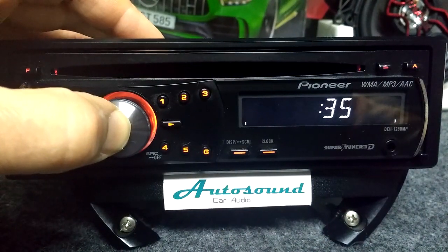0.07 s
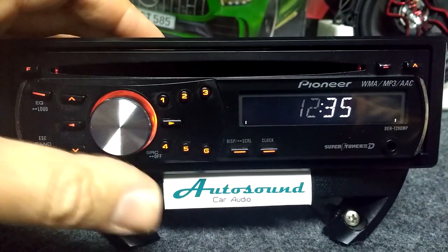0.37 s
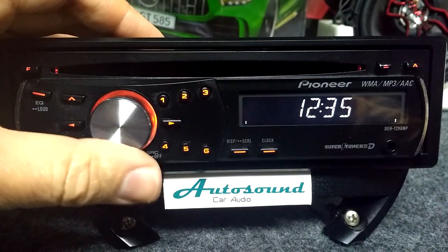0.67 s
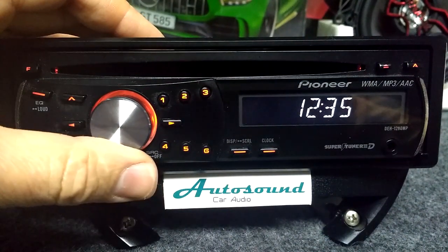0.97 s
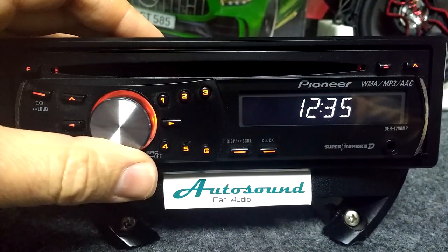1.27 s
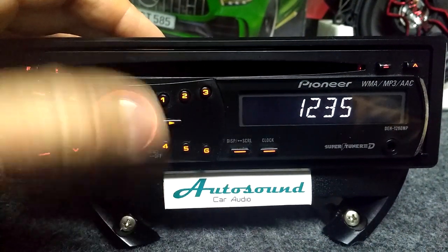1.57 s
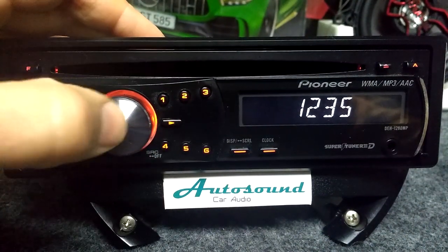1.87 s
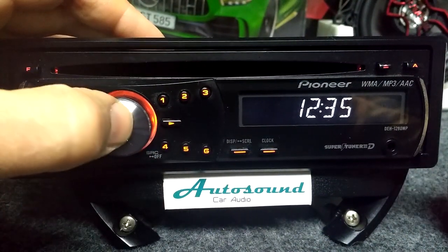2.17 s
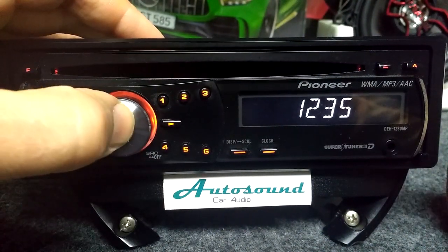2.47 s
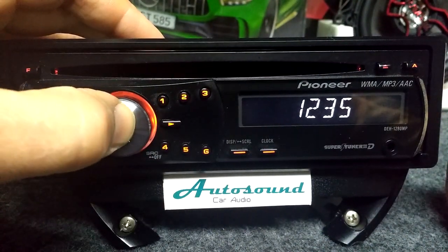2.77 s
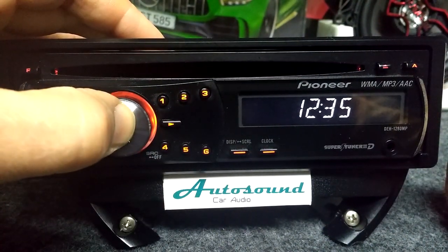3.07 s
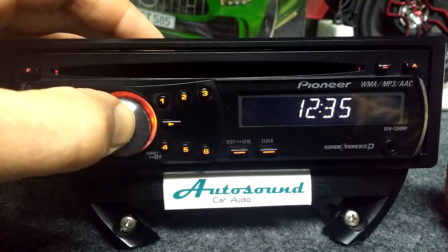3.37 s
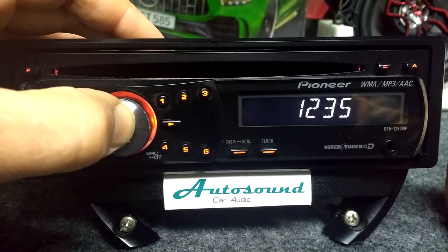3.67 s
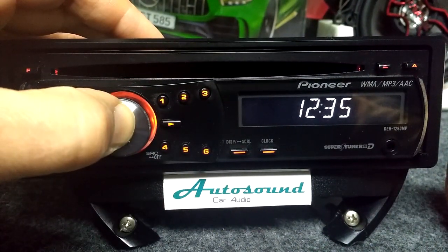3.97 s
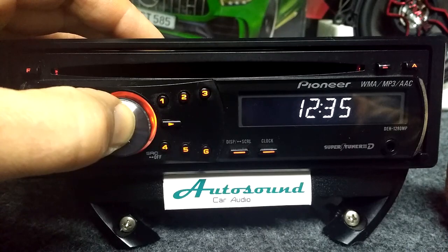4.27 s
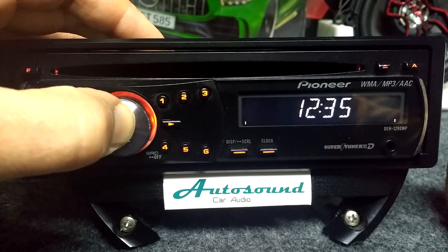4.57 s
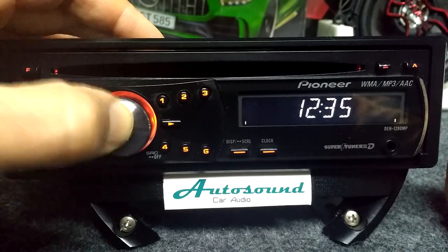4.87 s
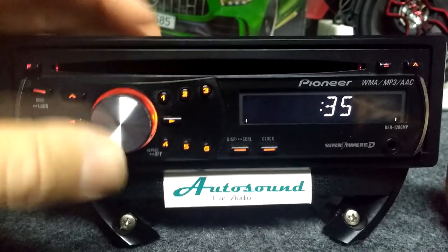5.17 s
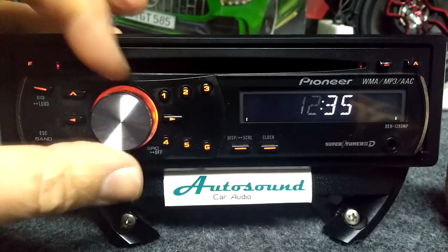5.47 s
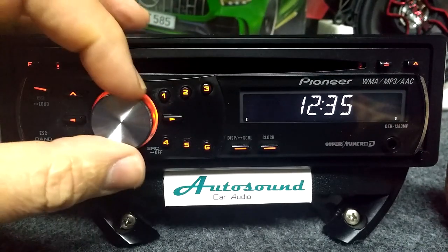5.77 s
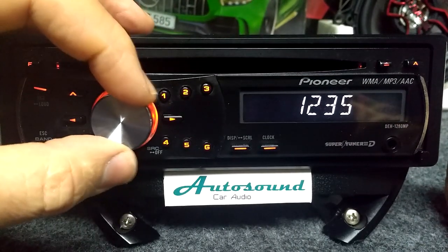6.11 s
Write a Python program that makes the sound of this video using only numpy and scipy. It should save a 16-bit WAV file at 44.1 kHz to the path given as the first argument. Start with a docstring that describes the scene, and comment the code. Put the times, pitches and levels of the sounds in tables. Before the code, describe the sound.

Close plastic clicks of a car stereo knob being pressed and turned, over a muffled vehicle drone slowly winding down outside.

```python
"""Car stereo knob on a workbench

Close up, a thumb presses, turns and slides off a plastic knob; each click rings the front panel.
Outside, a motor vehicle pulls up in pitch, eases off and slowly runs down, its drone and exhaust
burbles coming dully through the walls. The small room has a steady hush, and the recorder widens
the stereo picture by delayed cross-feed."""
import sys
import numpy as np
from scipy import signal
from scipy.fft import rfft, irfft, next_fast_len
from scipy.io import wavfile

SR = 44100
rng = np.random.default_rng(int(sys.argv[2]) if len(sys.argv) > 2 else 0)


def file_out(sig):
    """Save sig as 16-bit WAV at sys.argv[1]."""
    # one column per channel
    cols = np.atleast_2d(sig).T
    # limit, then scale
    lim = np.clip(cols, -1, 1)
    pcm = np.round(lim * 32767).astype(np.int16)
    wavfile.write(sys.argv[1], SR, pcm)


N = 275184
TIME = np.arange(N) / SR


def from_db(db):
    """Decibels to gain."""
    return 10 ** (np.asarray(db) / 20)


def rms_one(x):
    """Scale to rms 1."""
    return x / np.sqrt(np.mean(x ** 2) + 1e-20)


def attack_one(x):
    """Scale a hit so that its first 15 ms have rms 1."""
    return x / np.sqrt(np.mean(x[:, :round(.015 * SR)] ** 2))


def automation(rows):
    """One curve at every sample for each column after the time."""
    times, *columns = np.transpose(rows)
    return [np.interp(TIME, times, column) for column in columns]


def at_hz(points, hz):
    """Read an EQ curve on a log-frequency axis."""
    known, values = np.transpose(points)
    return np.interp(np.log(hz + 1e-9), np.log(known), values)


def humps(where, rows):
    """Sum of bell curves, one for each row of (centre, half width, height)."""
    return sum(height * np.exp(-((where - centre) / width) ** 2) for centre, width, height in rows)


def panned(left_db):
    """Channel gains for a left-minus-right level."""
    return from_db(np.array([[1], [-1]]) * left_db / 2)


def drift(rate_hz):
    """Smooth random modulation with a spread of about 1."""
    hop, run_in = 40, 2000
    pole = np.exp(-2 * np.pi * hop * rate_hz / SR)
    noise = rng.standard_normal(N // hop + run_in + 2)
    slow = signal.lfilter([1], [1, -2 * pole, pole * pole], noise)[run_in:]
    return np.interp(np.arange(N) / hop, np.arange(len(slow)), rms_one(slow))


def stereo_noise(alike, size):
    """White noise whose two channels have the correlation `alike`."""
    mid, side = rng.standard_normal((2, size))
    return np.sqrt((1 + alike) / 2) * mid + np.sqrt((1 - alike) / 2) * side * [[1], [-1]]


def coloured(eq, alike, ripple_db):
    """Stereo noise through an EQ curve, rippled by the room's standing waves; rms 1."""
    size = next_fast_len(N)
    hz = np.arange(size // 2 + 1) * SR / size
    ripple_hz = np.geomspace(300, 16000, 260)
    ripple = np.interp(hz, ripple_hz, rng.standard_normal(len(ripple_hz)), left=0)
    gain = from_db(at_hz(eq, hz) + ripple_db * ripple)
    return rms_one(irfft(rfft(stereo_noise(alike, size)) * gain, size)[:, :N])


def resonate(x, hz, width_hz):
    """One two-pole resonance."""
    r = np.exp(-np.pi * width_hz / SR)
    return signal.lfilter([1, 0, -1], [1, -2 * r * np.cos(2 * np.pi * hz / SR), r * r], x)


def resonate_twice(x, hz, width_hz):
    """Two equal resonances in series, for steeper skirts."""
    return resonate(resonate(x, hz, width_hz), hz, width_hz)


def engine_tone(cycles, scatter, flutter):
    """One partial: echoes scatter its phase at each microphone, uneven firing roughens it; rms 1."""
    uneven = flutter * (drift(13.2) + 1j * drift(11.7))
    mics = [np.exp(1j * scatter * drift(1.02)) * (1 + uneven + flutter * drift(15.2)) for _ in range(2)]
    left_lead = np.array([[0.12], [0]])   # cycles
    tone = np.exp(2j * np.pi * (cycles + rng.random() + left_lead))
    return rms_one(np.real(np.array(mics) * tone))


def echo_fading(depth_db=1.6, rate_hz=5.5):
    """Shifting echoes make a partial swell and fade, partly alike in both channels; rms 1."""
    shared = drift(rate_hz)
    sway = np.array([shared + drift(rate_hz) for _ in range(2)]) / np.sqrt(2)
    return rms_one(from_db(depth_db * sway))


def coasting(from_s=2.145, closing_s=0.039):
    """Throttle crossfade: 0 while the engine pulls, 1 once it coasts."""
    return np.clip((TIME - from_s) / closing_s, 0, 1)


# Engine pitch: (time [s], firing rate [Hz])
ENGINE_PITCH = [(0.0, 117.7), (0.8, 130), (1.15, 133.3), (1.3, 130.1), (1.5, 119.5), (1.9, 118.5),
                (2.3, 112.8), (2.7, 109.1), (3.9, 95.8), (4.2, 90.7), (4.45, 97.43), (4.9, 95.5),
                (5.2, 88.73), (5.9, 82.55), (6.24, 82.86)]
# The vehicle comes near and draws away: (time [s], upper-order gain [dB], roughness [0-1])
ENGINE_PASS = [(0, -5, 0.8), (.9, 0, 0.64), (1.6, 0, 0.49), (2.7, -1, 0.26), (3.9, 0, 0.32),
               (4.7, -8, 0.57), (6.24, -14.5, 0.28)]
def engine():
    """Firing makes a boom, upper orders and a whine; burbles roughen them and duck the upper orders."""
    firing_hz, = automation(ENGINE_PITCH)
    near_db, rough = automation(ENGINE_PASS)
    burble = burble_envelope()
    burble /= burble.max()
    rough = rough + 0.091 * burble
    near_db = near_db - 3.5 * burble
    cycles = np.cumsum(firing_hz) / SR
    return boom(cycles, rough) + upper_orders(cycles, firing_hz, near_db, rough) + whine(cycles, rough)


# Fader ride of the boom: (time [s], level before trim [dB])
BOOM_LEVEL = [(0, -38), (.17, -43), (.35, -25), (.5, -35.5), (.95, -28.5), (1.05, -32.5), (1.33, -39),
              (1.5, -24), (1.9, -28), (2.18, -22.5), (2.55, -26.5), (2.83, -29.5), (2.99, -24.5),
              (3.24, -22), (3.42, -30.5), (4.18, -31), (4.28, -44), (4.55, -34.5), (5.12, -40), (5.33, -54),
              (5.46, -34.5), (5.9, -36), (6.24, -40.5)]
# Pan of the boom: (time [s], left minus right [dB])
BOOM_BALANCE = [(0, 3), (.35, -6.5), (.55, -1), (1.3, 3), (1.5, -5.5), (1.98, -10.5), (2.13, 0), (2.55, 4),
                (2.8, -6), (3.0, 0.5), (3.3, -3.5), (4.2, -3.5), (6.24, -4.5)]
def boom(cycles, rough):
    """The engine's fundamental at the firing rate, swelling and wandering between the channels."""
    level_db, = automation(BOOM_LEVEL)
    left_db, = automation(BOOM_BALANCE)
    tone = engine_tone(cycles, scatter=0.35, flutter=0.5 * rough)
    return from_db(level_db - 1.5) * tone * panned(left_db)


# Body of the drone: (order [x firing rate], base level pulling [dB], base level coasting [dB])
STRONG_ORDERS = [(1.5, -50, -34), (2, -35.5, -33), (3, -39.5, -44.5)]
# Faint overtones: (order [x firing rate], level against order 3 [dB])
FAINT_ORDERS = [(2.5, -5.5), (4, -20), (6, -20)]
# Room modes: (centre [Hz], half width [Hz], boost [dB])
ROOM_PEAKS = [(197.4, 3.46, 3), (291.3, 4.7, 6.5), (351.8, 9, 9), (389.5, 6.7, 2.5), (523, 27, 13.5)]
def upper_orders(cycles, firing_hz, near_db, rough):
    """A four-stroke cycle gives whole and half orders; room modes lift each as it glides through."""
    out, order_db = 0, {}
    for order, pulling_db, coasting_db in STRONG_ORDERS:
        order_db[order] = near_db + pulling_db + coasting() * (coasting_db - pulling_db)
        gain = from_db(order_db[order] + humps(order * firing_hz, ROOM_PEAKS))
        out += gain * echo_fading() * engine_tone(order * cycles, scatter=0.52, flutter=rough)
    for order, level_db in FAINT_ORDERS:
        gain = from_db(order_db[3] + level_db + humps(order * firing_hz, ROOM_PEAKS))
        out += gain * engine_tone(order * cycles, scatter=1.0, flutter=rough)
    return out * panned(left_db=-2.5)


# Dull exhaust EQ: (frequency [Hz], relative level [dB])
RUMBLE_EQ = [(30, -33), (55, -15), (80, 6.5), (130, 3.5), (190, 7.5), (270, 2), (310, -3.5), (355, 1),
             (400, -12.5), (550, -51.5)]
def exhaust_rumble():
    """Low exhaust noise that partly follows the boom, grows on coasting and surges in each burble."""
    boom_db, = automation(BOOM_LEVEL)
    rumble_db = -43 + 0.23 * (boom_db - boom_db.mean()) + 2 * coasting()
    gain = np.hypot(from_db(rumble_db), burble_envelope())
    return gain * coloured(RUMBLE_EQ, alike=0.61, ripple_db=1.0) * panned(left_db=-2.5)


# Fader ride of the road noise: (time [s], level before trim [dB])
ROAD_LEVEL = [(0, -50), (1.0, -47.5), (2.4, -49), (4.4, -49.5), (6.24, -50)]
# Road EQ: (frequency [Hz], relative level [dB])
ROAD_EQ = [(25, -6), (60, 3.5), (300, -3), (520, 5.5), (630, -3), (760, -1), (950, -8.5), (1100, -6.5),
           (1350, -7.5), (1800, -15), (2600, -11), (4500, -35.5)]
def road_noise(ride_db):
    """A muffled wash from the road, its level flickering slightly."""
    level_db, = automation(ROAD_LEVEL)
    flicker_db = 1.1 * drift(11.3)
    gain = from_db(level_db + 4.0 + ride_db + flicker_db)
    return gain * coloured(ROAD_EQ, alike=0.26, ripple_db=2.5)


# Airy room-tone EQ: (frequency [Hz], relative level [dB])
AIR_EQ = [(1200, -31), (2400, -1), (3300, 4.5), (4500, 2.5), (6200, 0), (7500, -3), (8600, -0.5),
          (10500, -14), (16000, -34)]
# A soft hiss of the thumb rubbing the knob, then two brief dips in the hush:
# (time [s], half length [s], gain on the air [dB])
RUB_AND_DIPS = [(1.85, 0.22, 6.5), (3.348, 0.17, -5.5), (5.383, 0.13, -3.5)]
def hush():
    """Road noise, room air and microphone hiss, lifted once to play the thumb's rub and dipped twice."""
    ride_db = humps(TIME, RUB_AND_DIPS)
    road = road_noise(0.43 * ride_db)
    air = from_db(-62 + ride_db) * coloured(AIR_EQ, alike=0.02, ripple_db=1.0)
    hiss = from_db(-65 + 0.24 * ride_db) * stereo_noise(0, N) * panned(left_db=-11.0)
    return road + air + hiss


def contact_force(blow_db=16, snap_s=0.0022, rebound_s=0.0016, rattle_s=0.003, room_s=0.019):
    """A switch snaps over with a hard blow and lands again; the panel rattles and the room answers."""
    t = np.arange(SR // 3) / SR
    blow = from_db(blow_db) * (t == 0)
    landing = np.maximum(t - rebound_s * rng.uniform(0.54, 1.4), 0)
    snap = np.exp(-t / snap_s) + from_db(-9.5) * np.exp(-landing / snap_s) * (landing > 0)
    tail = from_db(-8) * np.exp(-t / rattle_s) + from_db(-14) * np.exp(-t / room_s)
    return blow + snap * stereo_noise(0.023, len(t)) + tail * stereo_noise(0.04, len(t))


# Front panel resonances: (pitch [Hz], width [Hz], relative level [dB])
PANEL_MODES = [(360, 32, -6), (545, 71, 10), (750, 53, 14.5), (890, 110, 6), (1100, 53, -15),
               (1365, 74, -3.5), (1790, 110, -6.5), (2300, 120, 1.5), (2730, 190, 4.5), (3320, 720, -12),
               (3800, 880, -26), (4580, 220, 12.5), (5780, 1300, 18.5), (8580, 840, 17), (10600, 6000, -30),
               (13700, 3100, -5)]
# Knock, clack, snap and tick bands: (low edge [Hz], high edge [Hz], trim [dB])
PANEL_BANDS = [(320, 776, -13.5), (1254, 1885, -18.5), (2420, 4010, -16.5), (4840, 11700, -21.5)]
BAND_CENTRES_HZ = np.array([np.sqrt(low * high) for low, high, _ in PANEL_BANDS])
def panel_ring(force, bands_db, direct_db=17, vary_db=0.5):
    """The switch's direct sound plus the panel's resonances, rebalanced in four bands."""
    low_cut = signal.butter(2, 1400, "high", fs=SR, output="sos")   # a small switch radiates no bass
    ring = from_db(direct_db) * rms_one(signal.sosfilt(low_cut, resonate(force, 2030, 5800)))
    for hz, width_hz, level_db in PANEL_MODES:
        gain = from_db(level_db - vary_db * rng.standard_normal())
        ring += gain * rms_one(resonate(force, hz, width_hz))
    out = 0
    for k, ((low, high, trim_db), level_db) in enumerate(zip(PANEL_BANDS, bands_db)):
        band = signal.butter(2, [low, high], "band", fs=SR, output="sos")
        polarity = (-1) ** k   # lets neighbouring bands join without a gap
        out += polarity * from_db(level_db + trim_db) * rms_one(signal.sosfilt(band, ring))
    return out


def struck_spot(force, hz, q=7, rattle_db=-17):
    """The blow rings the touched plastic at its own pitch, in step with the panel's nearest band."""
    push = signal.unit_impulse(force.shape[1]) + from_db(rattle_db) * force
    polarity = -(-1) ** sum(low < hz for low, _, _ in PANEL_BANDS)
    return attack_one(polarity * resonate_twice(push, hz, hz / q))


# Spring resonances: (pitch [Hz], width [Hz], relative level [dB])
SPRING_MODES = [(8840, 3400, 7), (12100, 8600, -4)]
def spring_crack(force):
    """The switch spring puts a thin, bright crack on the attack."""
    return attack_one(sum(from_db(db) * rms_one(resonate_twice(force, hz, width_hz))
                          for hz, width_hz, db in SPRING_MODES))


def click(at_s, crack_db, rings, bands_db):
    """One contact drives the panel, the struck spot and the spring, a little left of centre."""
    force = contact_force()
    hit = panel_ring(force, bands_db)
    hit += sum(from_db(db) * struck_spot(force, hz) for hz, db in rings)
    hit += from_db(crack_db) * spring_crack(force)
    placed = np.pad(hit, ((0, 0), (round(at_s * SR), N)))[:, :N]
    return placed * panned(left_db=3.0)


# Click cues, snap and knock before band trim: (time [s], snap [dB], brightness [dB/octave], knock [dB],
# crack [dB], low ring [Hz], its level [dB], high ring [Hz], its level [dB])
CLICK_CUES = [(0.025, -31, 0, -34, -56, 805, -37, 3380, -47),
              (0.115, -45, -11, -47, -67.5, 1750, -50, 3470, -54),
              (0.1695, -43.5, -5.5, -44, -56, 1960, -52, 3320, -52),
              (0.236, -43.5, -1, -51, -53.5, 1100, -50.5, 3800, -57),
              (0.299, -67, -2, -41.5, -75, 845, -48, 1650, -64),
              (0.86, -48, 3, -58, -68, 1860, -65, 3620, -58),
              (1.632, -43.5, 0.5, -47, -48, 1050, -48, 1680, -58),
              (2.2418, -38.5, -6.5, -56, -65, 1810, -44, 3460, -44.5),
              (2.2689, -42.5, -1.5, -54, -50, 1260, -60, 1920, -58),
              (2.401, -37.5, -3, -45.5, -47.5, 1750, -71, 6000, -70),
              (2.8566, -54.5, -5, -45, -54, 1790, -70, 3500, -64),
              (2.88, -61.5, -15, -47, -77, 1100, -51.5, 1690, -54),
              (3.143, -62, -14, -47, -79, 960, -49, 1540, -52),
              (3.263, -62, -10, -47, -78, 932, -50, 1400, -64),
              (4.8446, -33.5, -1.5, -34, -39, 890, -36, 3420, -44),
              (4.8785, -49, -14, -55, -72, 1300, -58, 3416, -49),
              (4.9363, -42.5, -4.5, -59, -46.5, 1590, -50, 3648, -58),
              (4.976, -59, -8, -63, -75, 1800, -61, 3700, -65),
              (5.1667, -37, -2, -40, -41, 1030, -45, 3200, -40),
              (5.199, -35.5, -2.5, -31.5, -64, 757, -33.5, 4470, -40),
              (5.2085, -52, -13, -40, -72, 673, -46, 1170, -52),
              (5.225, -59, 10, -62, -59, 1700, -64, 3380, -61),
              (5.247, -48.5, -0.5, -33, -69, 805, -50, 1700, -50),
              (5.2612, -62, -14, -38, -74, 1100, -47, 1550, -49)]
def knob_clicks():
    """The knob and its switch click, each with its own snap, brightness, knock, crack and two rings."""
    octaves_from_snap = np.log2(BAND_CENTRES_HZ[1:] / BAND_CENTRES_HZ[2])
    out = 0
    for at_s, snap_db, tilt, knock_db, crack_db, low_hz, low_db, high_hz, high_db in CLICK_CUES:
        rings = [(low_hz, low_db), (high_hz, high_db)]
        bands_db = [knock_db, *(snap_db + tilt * octaves_from_snap)]
        out += click(at_s, crack_db, rings, bands_db)
    return out


# Fader ride of the whine: (time [s], level before trim [dB])
WHINE_LEVEL = [(0, -99), (.5, -69), (.69, -35.5), (.8, -54), (1.2, -46), (1.5, -92)]
def whine(cycles, rough, order=10):
    """A high engine order sings thinly while the engine pulls."""
    level_db, = automation(WHINE_LEVEL)
    gain = from_db(level_db - 10.5) * echo_fading()
    return gain * engine_tone(order * cycles, scatter=0.74, flutter=0.5 * rough)


# Burble cues: (time [s], half length [s], burble level [dB], throb pitch [Hz], throb level [dB])
BURBLE_CUES = [(1.33, 0.12, -33, 87.5, -39), (2.084, 0.058, -34.5, 82.1, -30), (4.422, 0.14, -33, 115, -43),
               (4.634, 0.14, -48, 73.77, -37)]
def burble_envelope():
    """The exhaust burbles in short surges when the throttle or gear changes."""
    return humps(TIME, [(at_s, half_s, from_db(db)) for at_s, half_s, db, _, _ in BURBLE_CUES])


def pipe_throbs():
    """Each burble sets the exhaust pipe throbbing for a moment."""
    out = 0
    for at_s, half_s, _, hz, db in BURBLE_CUES:
        swell = humps(TIME, [(at_s, half_s, from_db(db))])
        out += swell * engine_tone(hz * TIME, scatter=0.89, flutter=0.35)
    return out


# Fader ride of the thumb sliding off the knob: (time [s], level [dB])
SLIDE_LEVEL = [(5.10, -102), (5.125, -47), (5.16, -69), (5.205, -62), (5.24, -46), (5.265, -50),
               (5.30, -95)]
# Skin-on-plastic EQ: (frequency [Hz], relative level [dB])
SLIDE_EQ = [(250, -22), (550, -37), (850, -1), (1400, -8.5), (2500, -6), (3400, -20), (6500, -26),
            (8800, -23), (11000, -31), (16000, -45)]
def thumb_slide(stick_db=5.0):
    """Skin sticks and slips over the plastic rim."""
    level_db, = automation(SLIDE_LEVEL)
    return from_db(level_db + stick_db * drift(120)) * coloured(SLIDE_EQ, alike=0.28, ripple_db=2.5)


# Tick cues: (time [s], level before EQ and trim [dB])
TICK_CUES = [(5.9055, -42), (6.1395, -49.5)]
# Thin, bright tick EQ: (frequency [Hz], gain [dB])
TICK_EQ = [(500, -31), (1500, -22), (3400, 7.5), (8100, 1)]
def shaft_ticks(ring_hz=3827):
    """The knob ticks lightly on its shaft, which rings; little of it reaches the panel."""
    eq_db = at_hz(TICK_EQ, BAND_CENTRES_HZ)
    return sum(click(at_s, crack_db=db - 8, rings=[(ring_hz, db - 13)], bands_db=db + eq_db)
               for at_s, db in TICK_CUES)


def scene():
    """Close clicks and a sliding thumb over the distant vehicle and the room."""
    knob = knob_clicks() + shaft_ticks() + thumb_slide()
    return knob + engine() + exhaust_rumble() + hush() + pipe_throbs()


# Stereo widener: (frequency [Hz], share of the other channel [0-1])
WIDENER = [(100, 0.15), (500, 0.17), (1200, 0.48), (2500, 0.86), (5000, 0.48), (7500, 0.32), (11000, 0.007),
           (16000, 0.04)]
def record(dry):
    """Each channel has a delayed copy of the other subtracted, widening the picture; the top is cut."""
    delay_s, cutoff_hz = 0.0004, 15800
    size = next_fast_len(N + SR // 10)
    hz = np.arange(size // 2 + 1) * SR / size
    share = at_hz(WIDENER, hz)
    spectra = rfft(dry, size)
    crossfeed = share * np.exp(-2j * np.pi * hz * delay_s) * spectra[::-1]
    wide = (spectra - crossfeed) / np.sqrt(1 + share ** 2)
    low_pass = signal.ellip(10, .1, 80, cutoff_hz, fs=SR, output="sos")
    return signal.sosfilt(low_pass, irfft(wide, size)[:, :N])


dry = scene()
out = record(dry)
file_out(out)
```